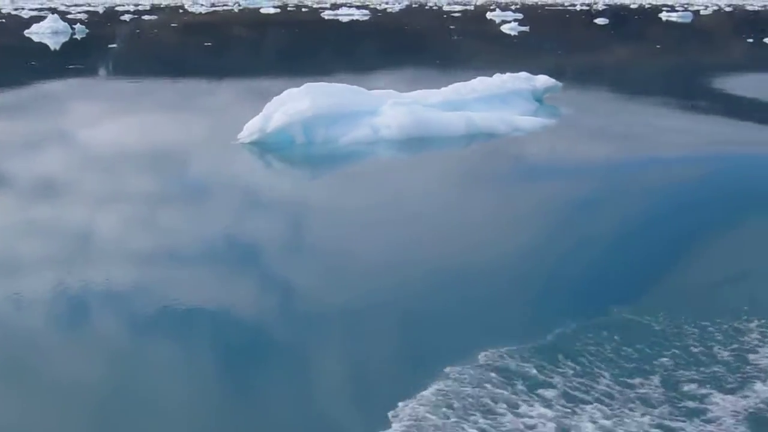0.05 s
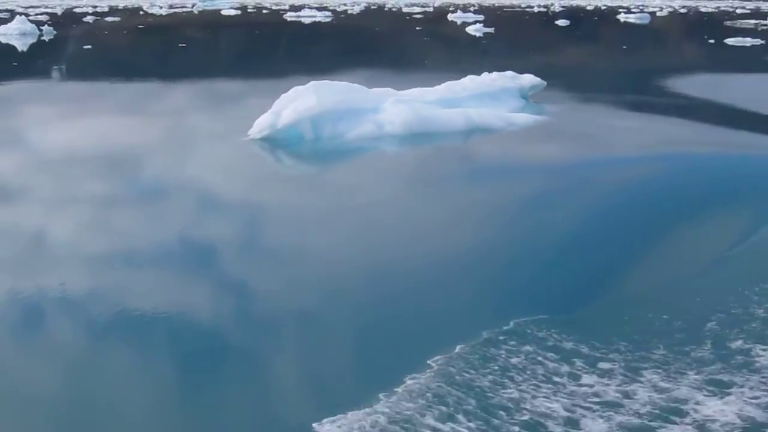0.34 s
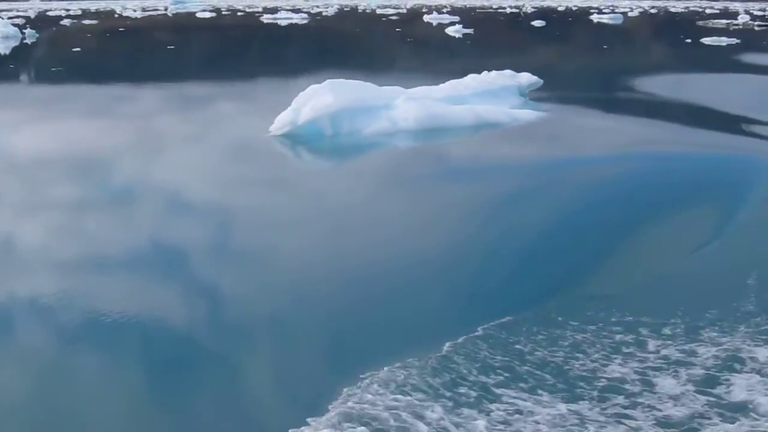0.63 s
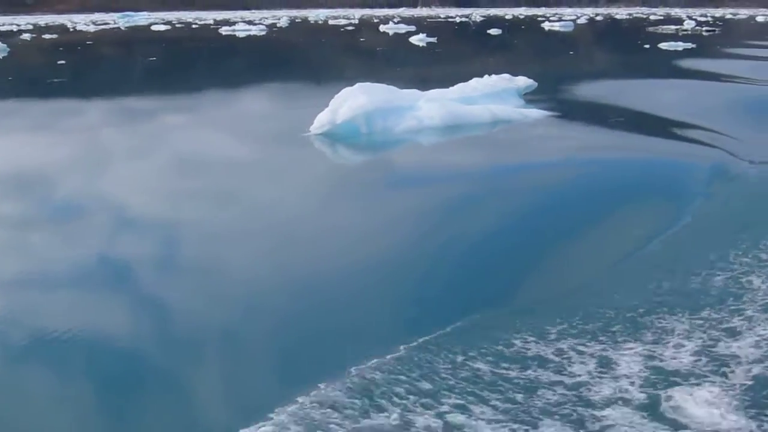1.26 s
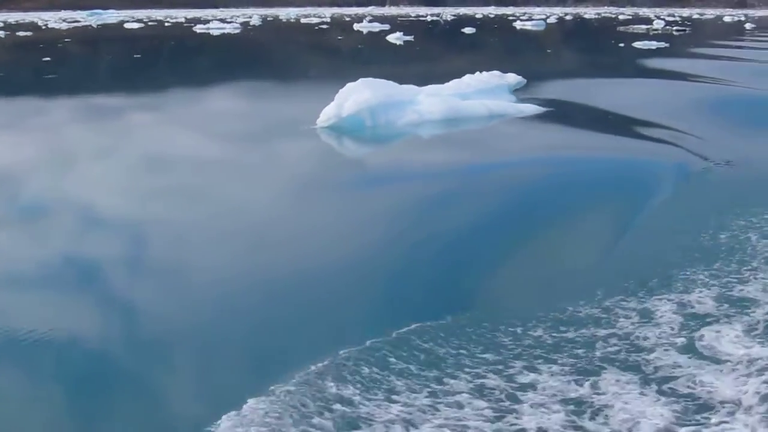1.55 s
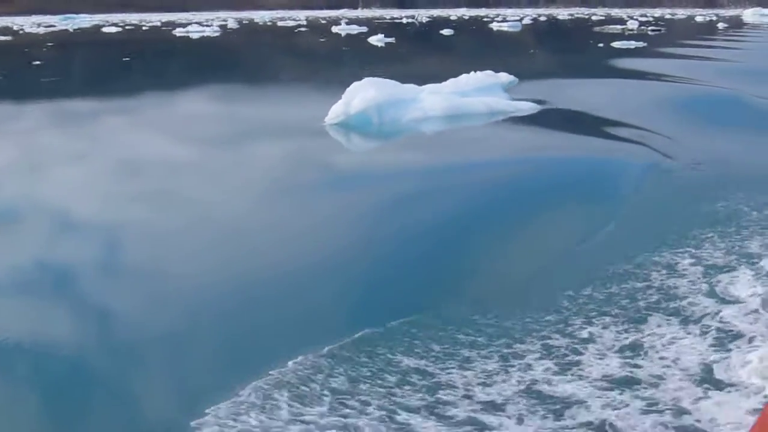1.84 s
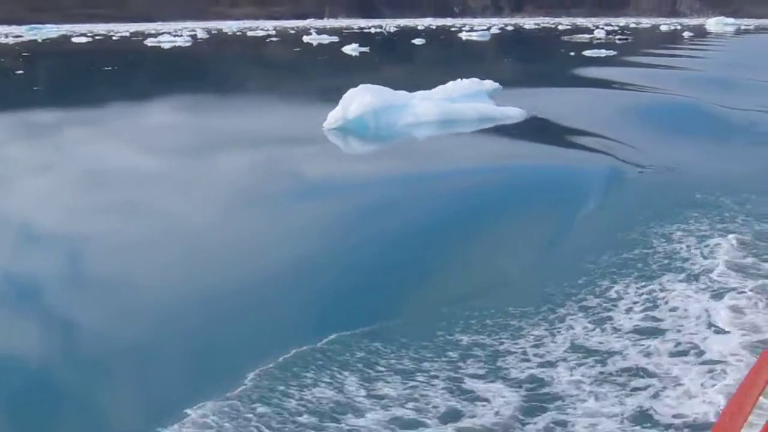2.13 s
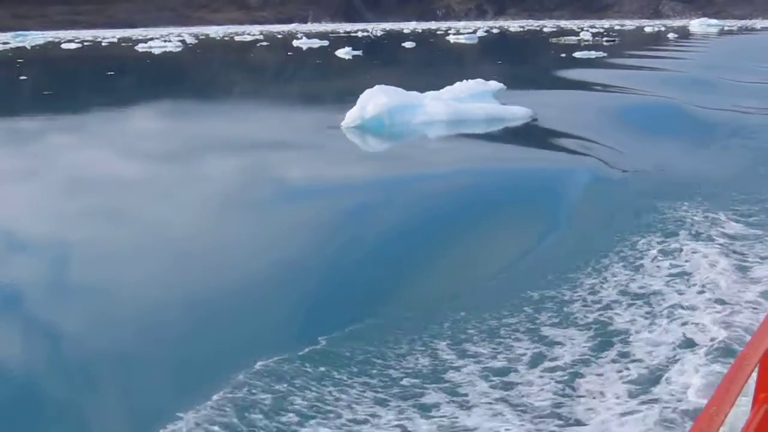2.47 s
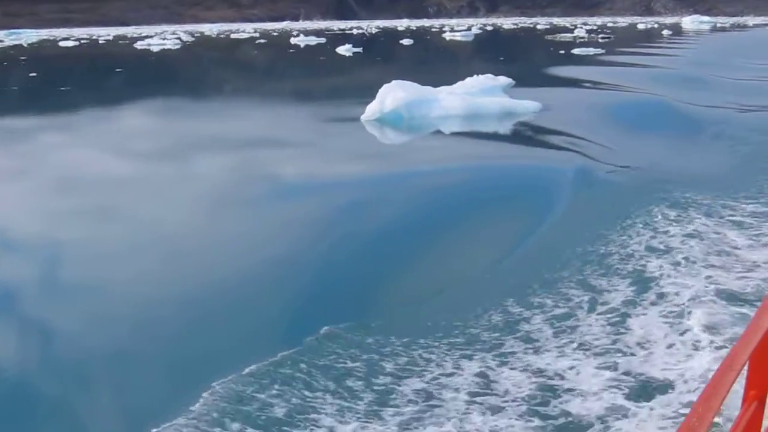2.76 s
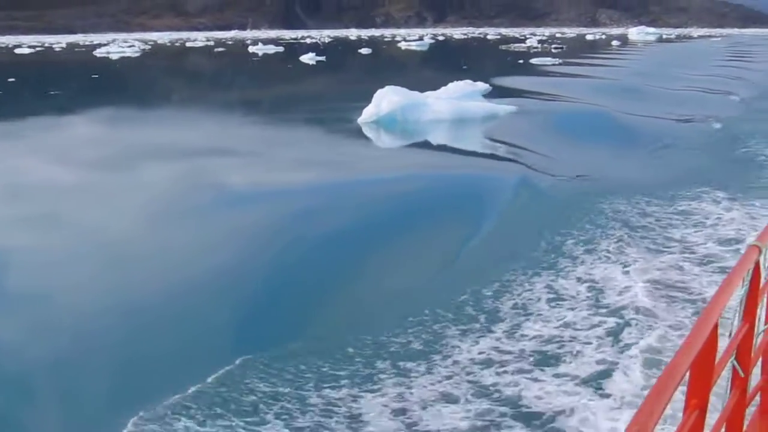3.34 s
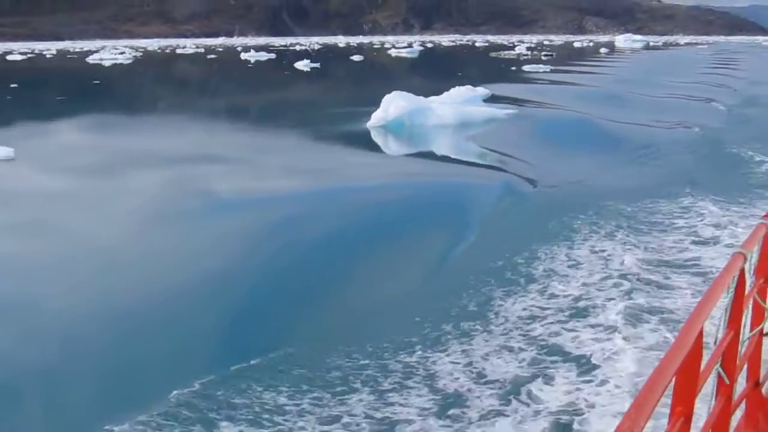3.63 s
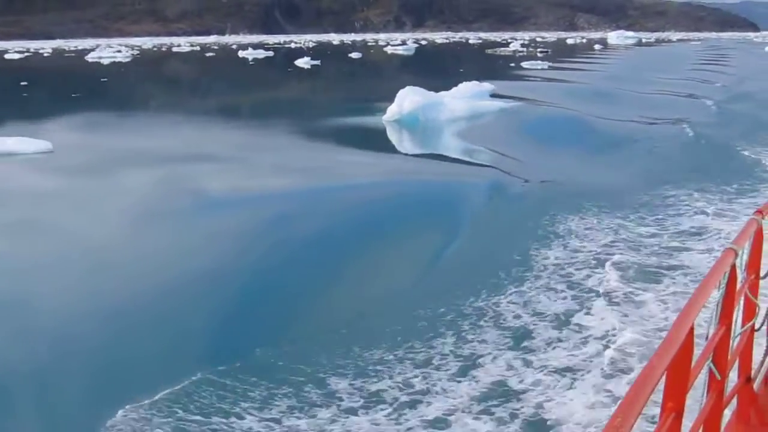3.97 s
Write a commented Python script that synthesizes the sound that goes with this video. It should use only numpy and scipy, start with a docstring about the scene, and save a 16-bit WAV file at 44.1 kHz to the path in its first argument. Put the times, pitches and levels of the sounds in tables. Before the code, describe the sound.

Water churns along a boat's hull over a droning diesel engine and buffeting wind.

```python
"""On the deck of a boat cruising over calm water, with a two-port stereo microphone out in the breeze.
The diesel drones and clatters as it fires, with a thin double whine, while along the hull the bow wave
churns and fizzes; near the end the water swells in the low mids as the microphone turns. Wind rumbles in
the ports; its hardest buffets rasp, pop and make the recorder's limiter duck everything for a moment."""
import sys
import numpy as np
from scipy import signal
from scipy.fft import rfft, irfft
from scipy.io import wavfile
from scipy.ndimage import uniform_filter1d

SR = 44100
rng = np.random.default_rng(int(sys.argv[2]) if len(sys.argv) > 2 else 0)


def transcribe(u):
    """Save the signal u as a 16-bit wav file named by the first command-line argument.

    u: samples, shape (n,) or (channels, n), limited to [-1, 1]; the rate is SR.
    q: integer samples, one column per channel.
    """
    v = np.clip(np.atleast_2d(u).T, -1, 1)
    q = np.round(v * 32767).astype(np.int16)
    wavfile.write(sys.argv[1], SR, q)


N = 176400
T = np.arange(N) / SR
BIN_HZ = np.fft.rfftfreq(N, 1 / SR)

# spectrum of water churning along the hull: frequency_hz, density_db
WATER_SPECTRUM = [(20, -22), (100, -0.5), (300, 3.5), (520, -1.3), (720, 0.5), (1000, -0.9), (1500, -3),
                  (2300, -7.5), (3500, -8.5), (5000, -11), (7000, -19), (9500, -19), (11500, -19),
                  (14000, -25), (15500, -40)]
# spectrum of air fluttering at a microphone port: frequency_hz, density_db
FLUTTER_SPECTRUM = [(10, -17), (50, 20), (200, 4), (500, -10), (1300, -33), (2500, -30), (6000, -58)]


def amp(db):
    """Decibels to gain."""
    return 10 ** (np.asarray(db) / 20)


def unit(x):
    """Scales to rms 1."""
    return x / np.sqrt(np.mean(x ** 2) + 1e-20)


def at_hz(table, hz, column=1):
    """One column of a table, interpolated on a log-frequency axis."""
    table = np.array(table, float)
    return np.interp(np.log(hz + 1), np.log(table[:, 0] + 1), table[:, column])


def over_time(table):
    """Straight lines through (time, value) points, sample by sample."""
    return np.interp(T, *np.transpose(table))


def noise(spectrum):
    """Steady noise of rms 1 with the given spectral shape."""
    return unit(irfft(rfft(rng.standard_normal(N)) * amp(at_hz(spectrum, BIN_HZ)), N))


def drift(rate_hz):
    """Random wander of rms 1, up to about the given rate."""
    lowpass = (BIN_HZ > 0) / (1 + (BIN_HZ / rate_hz) ** 4)
    return unit(irfft(rfft(rng.standard_normal(N)) * lowpass, N))


def at_ports(a, b):
    """Two unrelated sounds become left and right: alike in the bass, apart in the treble."""
    # how the two ports hear the water: frequency_hz, likeness (0-1), left_lead_rad, left_minus_right_db
    port_pair = [(100, .92, 0, 0), (400, .95, -.05, 0), (800, .97, .05, 0), (1100, .94, .2, -.3),
                 (1500, .88, .35, -.8), (2200, .87, .4, -2), (3000, .72, 1.25, -4.5),
                 (4300, .74, 2.15, 1.2), (6000, .65, 2.3, 3.5), (9000, .43, 2.9, 3), (15000, .3, 4.8, 3)]
    likeness, lead_rad, balance_db = (at_hz(port_pair, BIN_HZ, column) for column in (1, 2, 3))
    left = rfft(a)
    right = (likeness * left + np.sqrt(1 - likeness ** 2) * rfft(b)) * np.exp(-1j * lead_rad)
    return irfft(np.array([left * amp(balance_db / 2), right * amp(-balance_db / 2)]), N)


def diesel():
    """A steady four-stroke, alike at both ports: droning orders, clatter pulsing with the firing, whine."""
    # engine tones: multiple_of_cycle, level_db
    orders = [(3, -47), (4, -38), (7, -32.5), (8, -47.5), (9, -22), (11, -34), (12, -23.5), (15, -29.5),
              (16, -32.5), (18, -34), (24, -37), (27, -38.5)]
    # combustion noise: frequency_hz, density_db
    clatter_spectrum = [(60, 9), (140, -1.5), (240, 3), (380, 4.5), (600, -9.5), (1200, -28), (4000, -44.5)]
    # two close machinery tones: pitch_hz, level_db
    whines = [(2172.3, -45.5), (2202.2, -46)]
    # rise and fall of the whole engine on deck: time_s, gain_db
    loudness = [(0, -3), (.6, -2.5), (1.2, -0.1), (1.8, -0.4), (2.5, 0.5), (3.1, -1), (4, 1)]
    cycle_hz, speed_wander, knocks_per_cycle, knock_depth = 15.3, 0.00054, 4, 0.97
    phase = 2 * np.pi * np.cumsum(cycle_hz * (1 + speed_wander * drift(2.1))) / SR
    drone, whine = np.zeros(N), np.zeros(N)
    for order, db in orders:
        level = amp(db + drift(5.7))
        scatter = 2 * np.pi * 0.11 * rng.standard_normal()  # the orders stray from one sharp pulse
        drone += level * np.cos(order * phase + scatter)
    drone *= amp(0.17 * drift(25))  # faint throb
    knocks = 1 + knock_depth * np.cos(knocks_per_cycle * phase)
    clatter = amp(-32) * unit(knocks * noise(clatter_spectrum))
    for hz, db in whines:
        whine += amp(db + 2 * drift(24)) * np.cos(2 * np.pi * hz * T + 0.57 * drift(1.7))
    return amp(over_time(loudness)) * (np.sqrt(2) * (drone + whine) + clatter)


def foam(patch_db=0.87):
    """Rushing water whose level shifts in short patches of time and pitch."""
    frames = dict(nperseg=512, noverlap=384)
    hz, _, cells = signal.stft(rng.standard_normal(N), SR, **frames)
    patches = uniform_filter1d(rng.standard_normal(cells.shape), size=7, axis=0)
    patches = unit(uniform_filter1d(patches, size=14, axis=1))
    cells *= amp(at_hz(WATER_SPECTRUM, hz)[:, None] + patch_db * patches)
    return unit(signal.istft(cells, **frames)[1][:N])


def splashes(per_s=900, sizes=24, cycles=5.6, spread_db=2):
    """Small bubbles and drops of many sizes, each ringing for a few cycles as its pitch rises."""
    out = np.zeros(N)
    for hz in np.geomspace(450, 7000, sizes):
        age = np.arange(0, 4, hz / cycles / SR)  # in ring lengths
        envelope = (1 - np.exp(-8 * age)) * np.exp(-2 * age)
        ring = envelope * np.sin(2 * np.pi * cycles * age * (1 + 0.025 * age))
        hits = rng.random(N) < per_s / sizes / SR
        strength = amp(spread_db * np.minimum(rng.exponential(1, N), 4))
        out += unit(signal.oaconvolve(hits * strength, ring)[:N])
    return unit(out)


def bow_wave(fizz_hz=3500, fizz_follow=0.7):
    """Foam and splashes along the hull ride the swell of the bow wave and brighten with it."""
    # swell of the bow wave: time_s, gain_db
    swell = [(0, 1.5), (.15, 2.45), (.33, 1.7), (.48, 0.5), (.68, -1), (1, 0), (1.35, -0.3), (1.55, .5),
             (1.8, 0.7), (2, 0), (2.55, 1), (2.76, -1), (3.05, 0.06), (3.3, -0.5), (3.8, 0.84), (4, -3.5)]
    water = at_ports(*[amp(-22) * foam() + amp(-37) * splashes() for _ in range(2)])
    swell_db = over_time(swell) + 0.43 * drift(21)
    fizz = signal.sosfiltfilt(signal.butter(2, fizz_hz, "highpass", fs=SR, output="sos"), water)
    extra_fizz = fizz * (amp(fizz_follow * swell_db) - 1)  # the treble swells more than the body
    return (water + extra_fizz) * amp(swell_db)


def wind(likeness=0.5):
    """Breeze on the microphone: rumble partly shared by the ports, and small eddies at each on its own."""
    # rumble at the ports: frequency_hz, density_db
    rumble_spectrum = [(8, -32), (22, -5), (50, 4.5), (90, 1), (160, 0.5), (280, -6.5), (450, -17.5),
                       (800, -47), (2000, -38)]
    # strength of the breeze: time_s, gain_db
    breeze = [(0, 0.5), (.3, 0.5), (.6, -3.5), (.85, -0.5), (1.05, 1), (1.3, -4.5), (1.6, 1.5), (2.3, -2),
              (2.65, 1.5), (3.05, -6.5), (3.4, -0.5), (3.65, 1), (3.9, 0)]
    shared = noise(rumble_spectrum)
    own = np.array([noise(rumble_spectrum) for _ in range(2)])
    rumble = np.sqrt(likeness) * shared + np.sqrt(1 - likeness) * own
    eddies = np.array([unit(noise(FLUTTER_SPECTRUM) * amp(2 * np.minimum(drift(16), 2)))
                       for _ in range(2)])
    return amp(over_time(breeze)) * (amp(-23) * rumble + amp(-44.5) * eddies)


def water_rises(width_octaves=0.97):
    """Bands of water noise rise and fall: the short ones are crests tumbling beside the hull,
    the long one near the end is a broad low-mid swell as the microphone turns."""
    # rises in the water noise: peak_s, level_db, half_length_s, centre_hz
    rises = [(0.14, -24, 0.043, 900), (0.993, -28, 0.022, 2280), (1.568, -28.5, 0.045, 2400),
             (1.728, -26.5, .04, 850), (1.924, -26, 0.072, 750), (2.316, -26, 0.018, 450),
             (2.557, -28.5, .07, 650), (3.08, -30.5, 0.087, 1090), (3.697, -28.5, 0.4, 417),
             (3.83, -32.5, .08, 1610)]
    water = rfft(at_ports(*[unit(noise(WATER_SPECTRUM) + splashes()) for _ in range(2)]))
    out = np.zeros((2, N))
    for peak_s, db, half_length_s, centre_hz in rises:
        band = np.exp(-0.5 * (np.log2((BIN_HZ + 1) / centre_hz) / width_octaves) ** 2)
        envelope = np.exp(-0.5 * ((T - peak_s) / half_length_s) ** 2)
        out += amp(db) * envelope * unit(irfft(water * band, N))
    return out


def buffets():
    """An eddy flutters harder and harder at one port, rasps, and ends in a pop: a push and a pull."""
    # eddies hitting the microphone: pop_s, pop_db, build_s, pan, pop_width_s, rasp_db
    # (pan of -1 or less is the left port alone, 1 or more the right alone)
    hits = [(.336, -5, .012, 1, .0006, -23), (.476, -6, .005, -1.5, 0.00074, -36),
            (0.505, -7.5, .003, -1.2, 0.0011, -30), (.512, 4, 0.0013, -1.57, 0.00031, -18),
            (.572, -3, 0.0089, 1, 0.001, -18), (0.578, 2.5, 0.0077, 1, 0.00032, -9),
            (.722, -7, .004, 0.89, 0.002, -37), (2.668, -6, 0.026, .9, 0.00097, -34),
            (3.403, -4, 0.014, -0.72, 0.00057, -21), (3.447, -4.5, .012, -1.3, 0.00056, -34),
            (3.451, 7.5, .001, -1.23, 0.00012, -18), (3.864, 0.5, .016, -1.1, 0.00067, -27),
            (3.942, -1, 0.068, -1.1, .0007, -17), (3.959, -17, .003, 0.86, 0.00018, -11),
            (3.964, 8.5, 0.0013, 1, 0.00049, -8)]
    # air tearing past a port: frequency_hz, density_db
    rasp_spectrum = [(100, -24), (350, -7), (1100, 7), (1900, -2), (3500, -20), (8000, -39)]
    gap_s, flutter_fall_s, rasp_rise_s, rasp_fall_s = 0.0071, 0.0048, 0.0016, 0.0025
    flutter_noise, rasp_noise = noise(FLUTTER_SPECTRUM), noise(rasp_spectrum)
    out = np.zeros((2, N))
    for pop_s, pop_db, build_s, pan, width_s, rasp_db in hits:
        t = T - pop_s
        gap = 1 - np.exp(-(t / gap_s) ** 2)  # the flutter gives way to the pop
        flutter = flutter_noise * gap * np.exp(-abs(t) / np.where(t < 0, build_s, flutter_fall_s))
        rasp = rasp_noise * np.exp(-abs(t) / np.where(t < 0, rasp_rise_s, rasp_fall_s))
        pop = -t / width_s * np.exp(1 - abs(t / width_s))
        port_gains = np.clip([[1 - pan], [1 + pan]], 0, 1)
        out += port_gains * (amp(pop_db) * (pop + amp(-13) * flutter) + amp(rasp_db) * rasp)
    return out


def scene():
    """Engine, water and wind as they reach the microphone on deck."""
    return diesel() + bow_wave() + wind() + water_rises() + buffets()


def record(dry):
    """The recorder: a peak limiter that looks ahead and recovers slowly, a treble notch, band limits."""
    ceiling_db, lookahead_s, recovery_s = 1, 0.00079, 0.38
    notch_hz, notch_width_hz, low_cut_hz, high_cut_hz = 8183, 484, 17, 15600
    over_db = np.maximum(20 * np.log10(abs(dry).max(0) + 1e-9) - ceiling_db, 0)
    release, ahead = np.exp(-T / recovery_s), round(lookahead_s * SR)
    held_db = np.maximum.accumulate(over_db / release) * release
    duck_db = uniform_filter1d(held_db, size=2 * ahead + 1, origin=-ahead)
    limited = dry / amp(duck_db)
    off_centre = ((BIN_HZ - notch_hz) / notch_width_hz) ** 2
    notch = (off_centre / (1 + off_centre)) ** 2
    low_cut = BIN_HZ / np.hypot(BIN_HZ, low_cut_hz)
    coloured = irfft(rfft(limited) * notch * low_cut, N)
    high_cut = signal.firwin(511, high_cut_hz, window=("kaiser", 9), fs=SR)
    return signal.oaconvolve(coloured, high_cut[None], "same")


dry = scene()
out = record(dry)
transcribe(out)
```